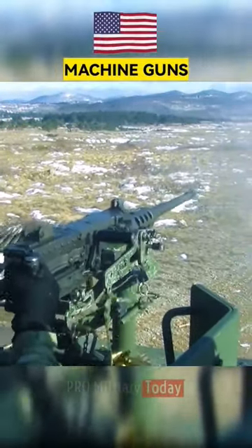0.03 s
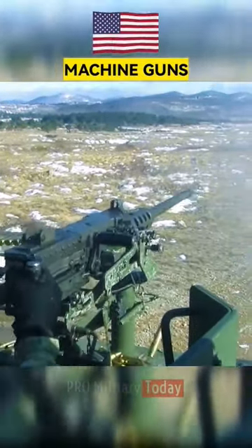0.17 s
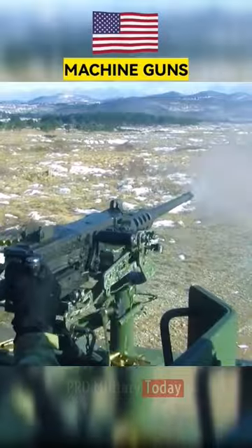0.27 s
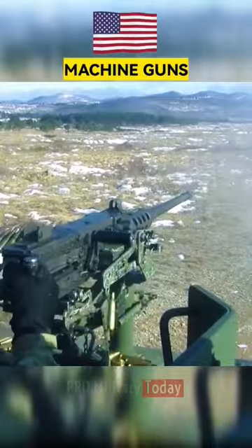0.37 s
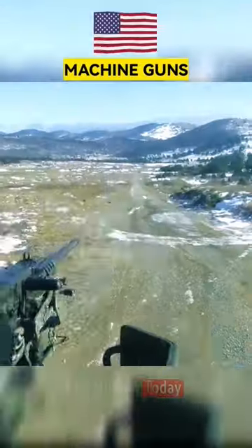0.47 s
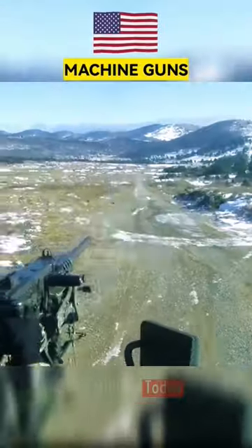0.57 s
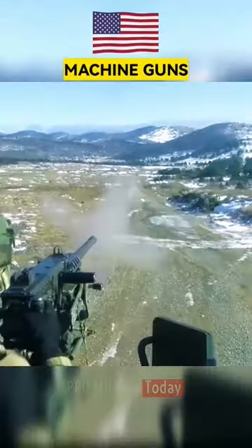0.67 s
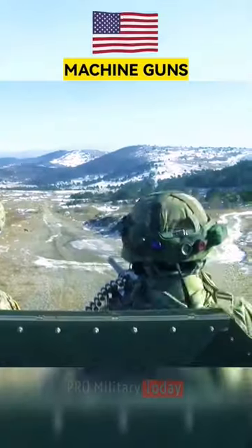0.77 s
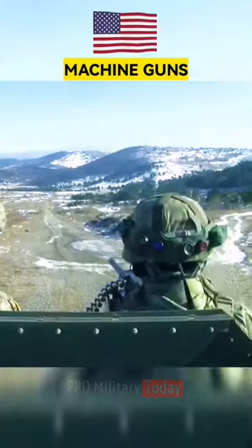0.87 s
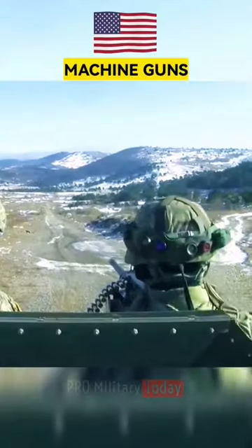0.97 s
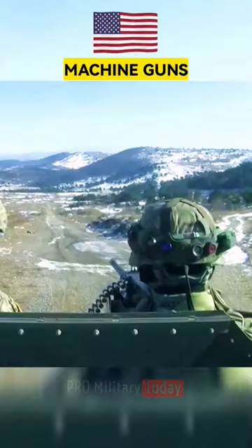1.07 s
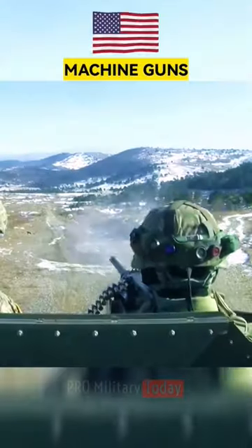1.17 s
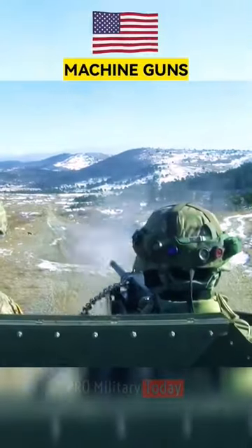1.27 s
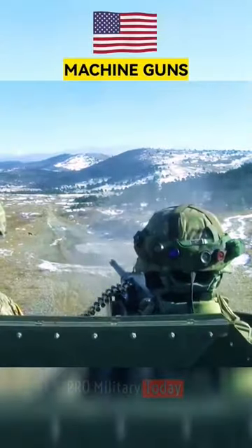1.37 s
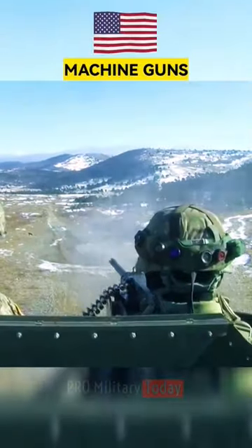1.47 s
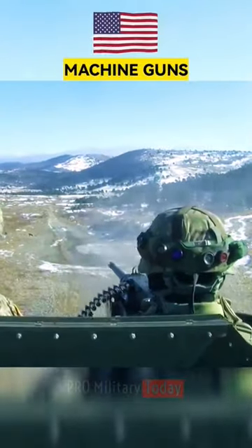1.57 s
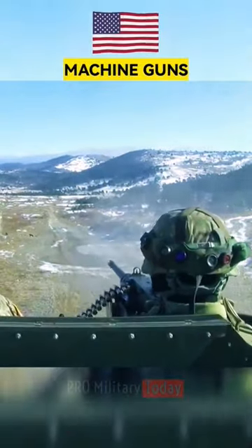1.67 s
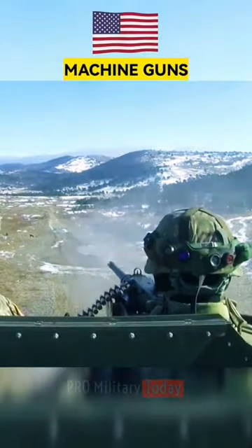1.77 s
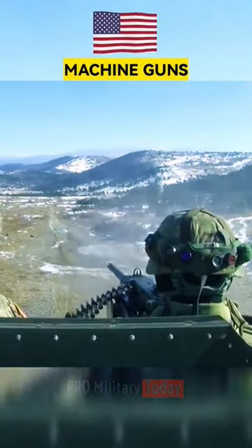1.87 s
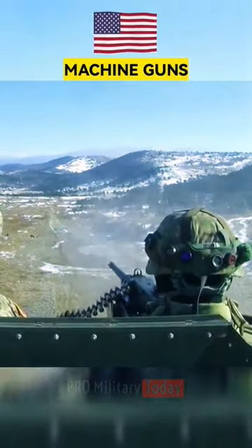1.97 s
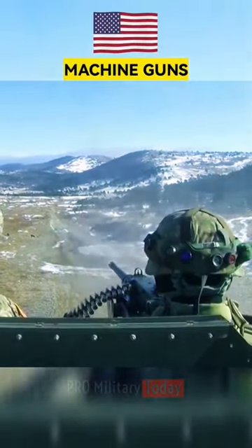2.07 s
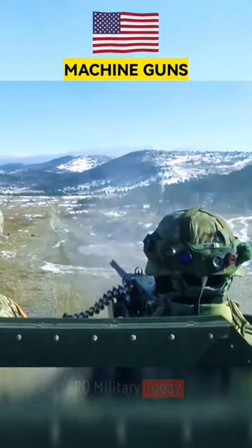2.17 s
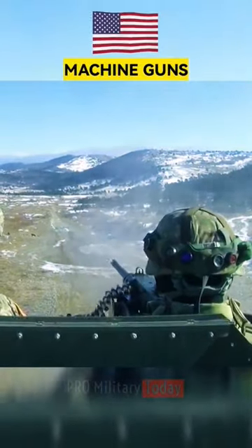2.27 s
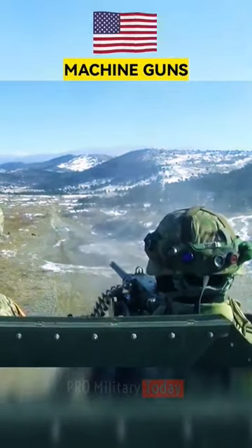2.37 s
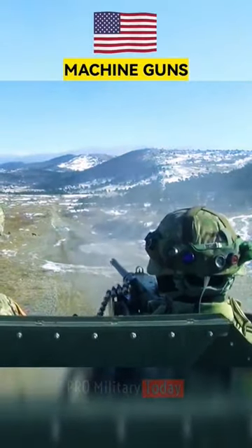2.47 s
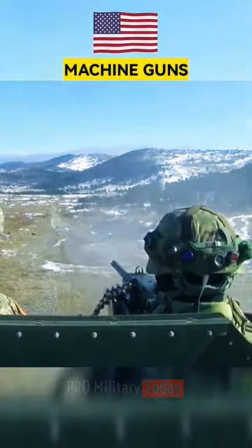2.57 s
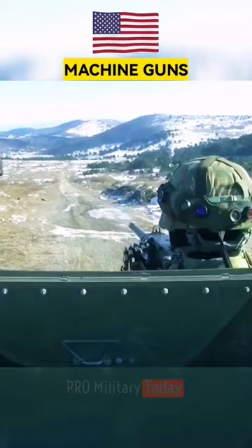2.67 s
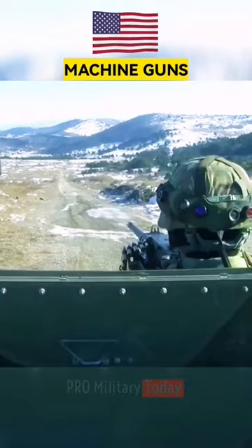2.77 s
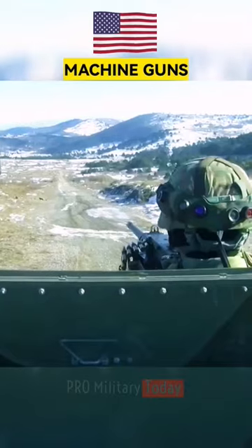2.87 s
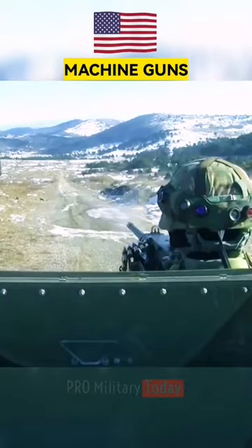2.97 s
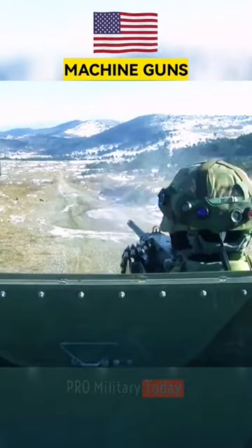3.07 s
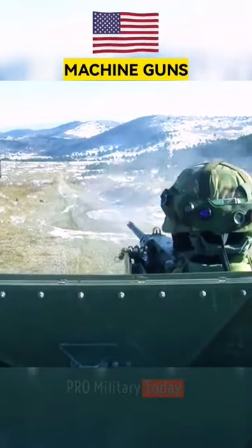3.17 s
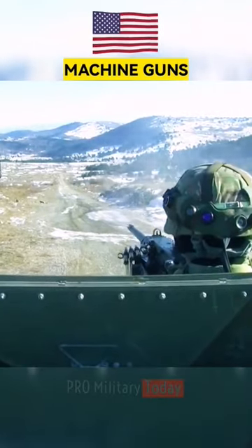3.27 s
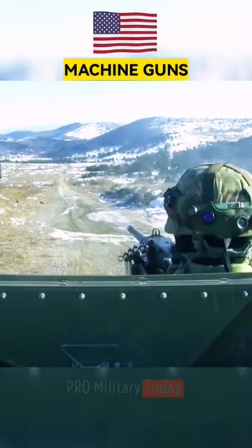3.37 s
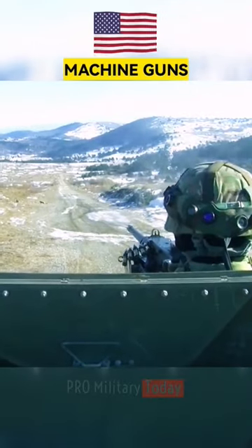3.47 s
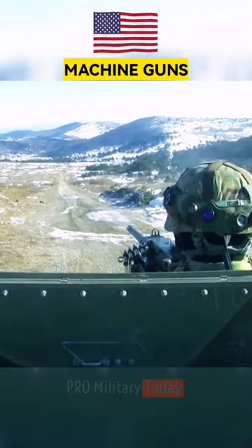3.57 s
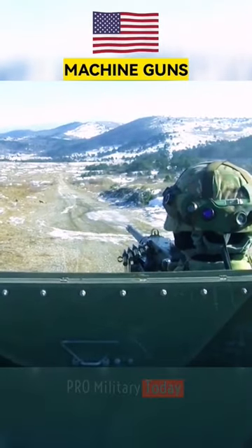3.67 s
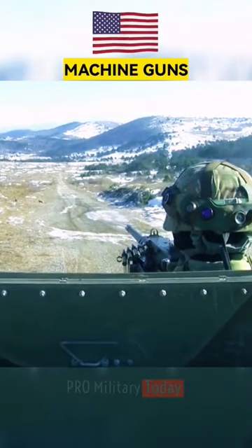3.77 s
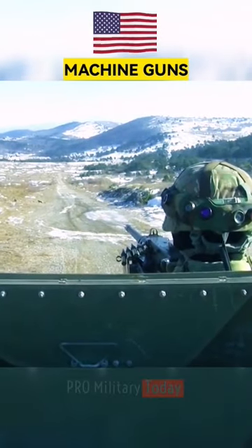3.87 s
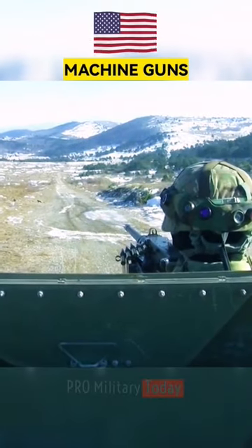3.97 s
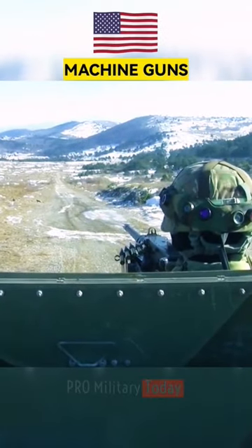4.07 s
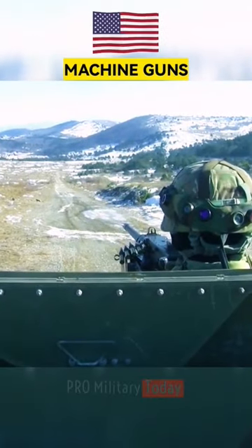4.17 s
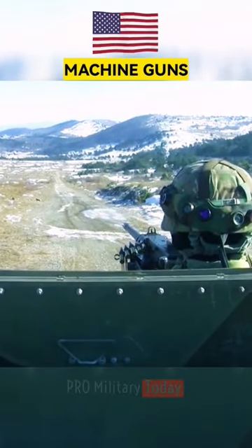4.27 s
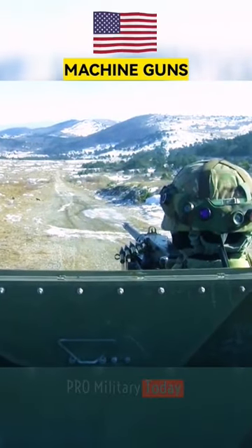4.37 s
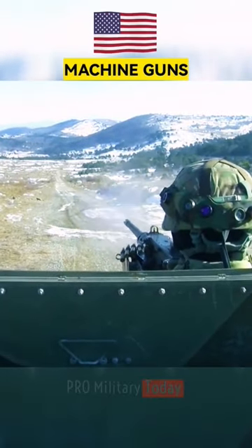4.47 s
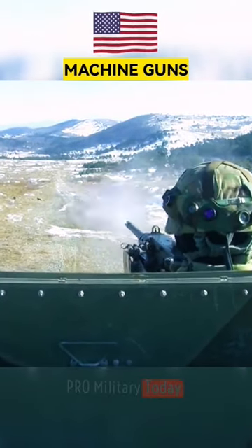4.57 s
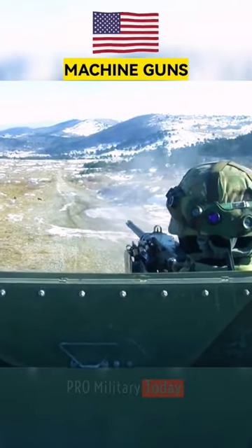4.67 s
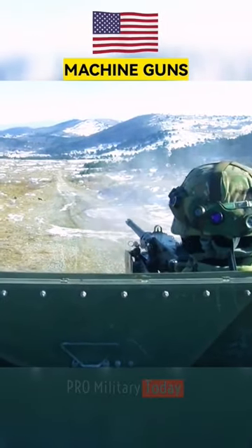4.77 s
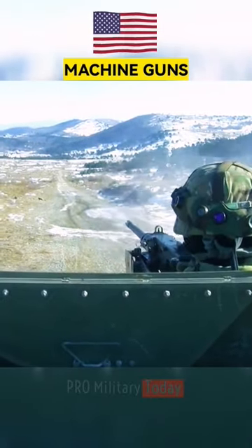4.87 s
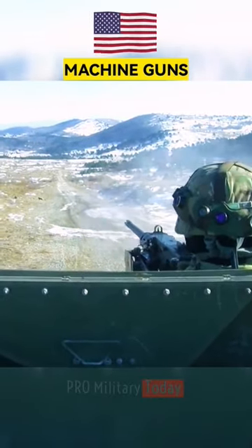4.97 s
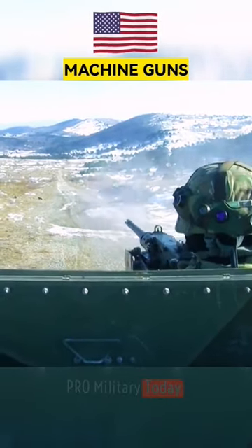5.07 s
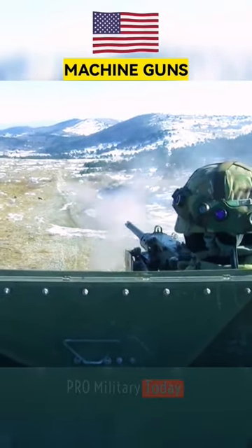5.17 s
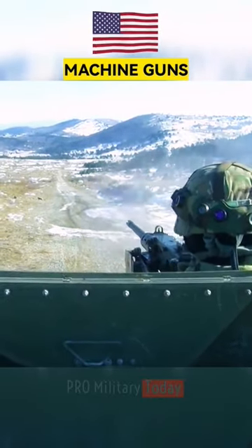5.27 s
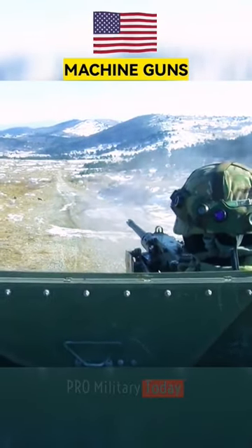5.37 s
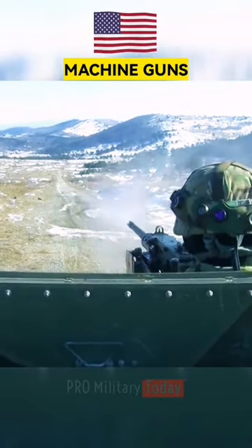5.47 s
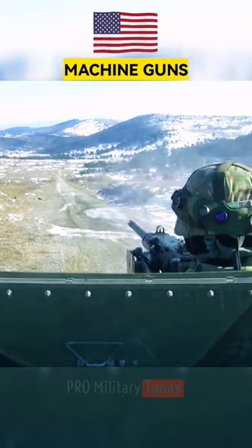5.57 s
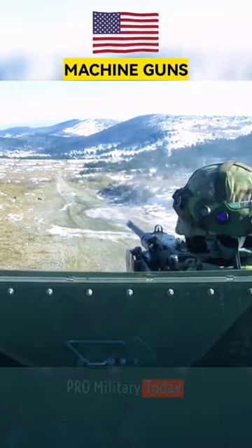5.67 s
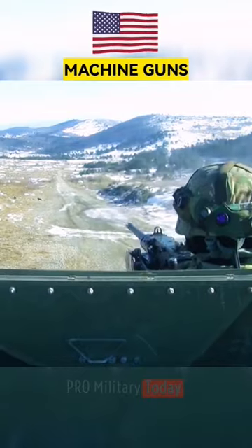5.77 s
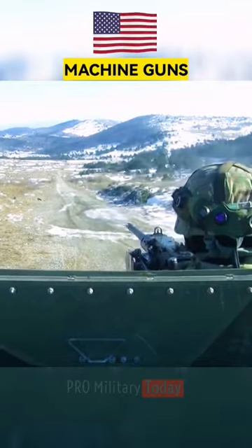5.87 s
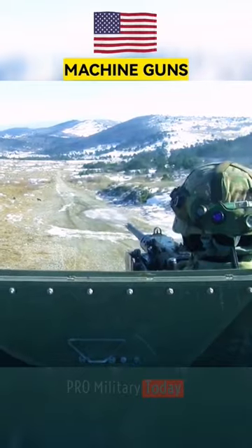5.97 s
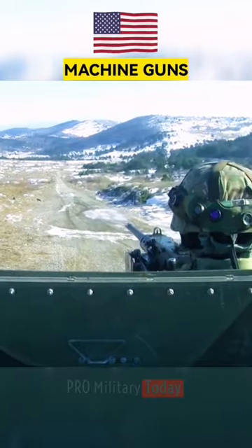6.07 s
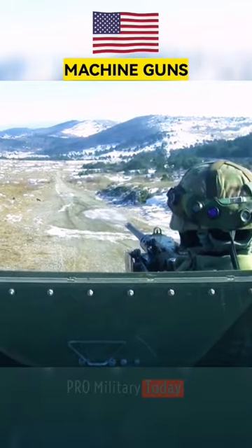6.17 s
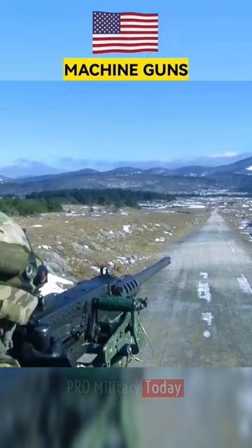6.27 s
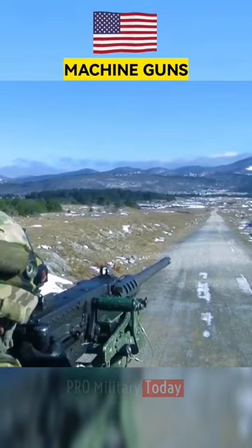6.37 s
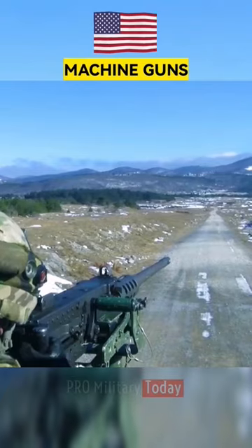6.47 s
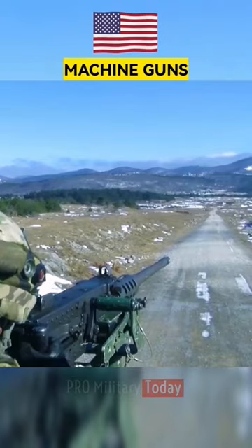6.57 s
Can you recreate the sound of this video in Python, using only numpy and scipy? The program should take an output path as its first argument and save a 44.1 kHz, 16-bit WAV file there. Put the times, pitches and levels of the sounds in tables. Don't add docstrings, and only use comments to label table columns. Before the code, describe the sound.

A heavy machine gun hammers out overloaded bursts on a windy open range, with pauses of rattling links, ringing brass and wind buffeting.

```python
import sys
import numpy as np
from scipy import signal
from scipy.fft import rfft, irfft
from scipy.io import wavfile
from scipy.ndimage import uniform_filter1d

SR = 44100
rng = np.random.default_rng(int(sys.argv[2]) if len(sys.argv) > 2 else 0)


def voltage_ratio(decibels):
    exponent = np.asarray(decibels, float) / 20
    return 10 ** exponent


def generate_wav(signal):
    frames = np.transpose(np.atleast_2d(signal))
    scaled = np.clip(frames, -1, 1) * 32767
    pcm = np.round(scaled).astype(np.int16)
    wavfile.write(sys.argv[1], SR, pcm)


N = 292383
STEPS = np.arange(0, N / SR + .002, .001)

# time in seconds, microphone ceiling in dB,
# bolt slam just before it in dB, crack drive into the microphone in dB.
BESIDE_SHOTS = [
    (.124, -6, -18, 8),
    (.291, -7.5, -20.5, 13),
    (.461, -6, -20, 8.5),
]
# (s, dB, dB, dB).
BEHIND_SHOTS = [(1.46, -7, -31, 9.7), (1.622, -6.5, -32, 6.5), (1.781, -6.5, -34.5, 7.4),
                (1.946, -7, -27, 7.9), (2.134, -6.5, -34, 7.7), (2.276, -7, -39, 8.2),
                (2.426, -6.5, -31, 7.8), (2.593, -7, -35, 8.2), (2.749, -7, -29, 9.6),
                (3.321, -6.5, -24, 10), (4.765, -6, -21, 7.2), (4.915, -7, -31, 10.2),
                (5.089, -6, -29.5, 7.6), (5.224, -7, -32, 8.2), (5.371, -7, -33, 11), (5.515, -7, -37, 10),
                (5.659, -6.5, -28, 8.4)]
# time in
# seconds, peak in dB, treble over the peak in dB, pitch of the struck plate in Hz.
CLANKS = [(.582, -25.5, -3.5, 3100), (.613, -16.5, -6, 1890), (.615, -21, -0.5, 1010),
          (.849, -46, 10, 2030), (.865, -28, -12, 940), (.88, -36, -6, 1500), (.909, -32.5, -9, 2190),
          (2.974, -40, -5, 1000), (3.466, -34, 2, 1050), (3.526, -29.5, -12.5, 2170),
          (3.601, -34, -6, 2080), (3.739, -44, 1, 1710), (3.767, -37, -25, 3130), (3.836, -29, -37, 1350),
          (3.986, -31.5, -19, 1150), (4.063, -33.5, -34, 1580), (4.08, -22.5, -2.5, 1680),
          (4.133, -23, -13, 920), (4.179, -10.5, -14, 2900), (4.277, -25.5, -26, 1060),
          (4.421, -12, -16, 1460), (4.473, -31, 0, 902), (5.781, -25.5, -5.5, 3100), (5.938, -27, -9, 2110),
          (6.086, -42, 0, 4100), (6.13, -38, -20, 1440), (6.211, -26, -22, 1710), (6.272, -25, -12, 2140),
          (6.389, -31, -17.5, 945), (6.43, -25, -19, 1540)]
# start in seconds, end in seconds.
QUIET = [
    (.62, 1.305),
    (2.824, 3.165),
    (3.49, 4.611),
    (5.79, 6.461),
    (6.463, 6.64),
]
# start in seconds, end in seconds,
# brass ring in dB, link fizz in dB.
HEAPS = [
    (-.1, .6, -56, -59.5),
    (1.32, 2.8, -61, -68),
    (3.216, 3.5, -60, -67),
    (3.48, 3.84, -66, -95),
    (4.568, 5.88, -61.5, -63),
    (5.84, 6.28, -61, -90),
]


def gunfire():
    # pitch in Hz, level in dB, time to fall 60 dB in s.
    mount_modes = [(280, 9, .02), (345, 2.5, 0.034), (540, -2.5, 0.014), (606, -1, 0.046),
                   (656, -5.5, 0.082), (1000, 2, 0.013)]
    # pitch in Hz, level in dB, time to fall 60 dB in s.
    hull_modes = [(272, 11.5, .018), (425, -7, .107), (545, 10.6, .025), (560, -7, .09), (627, 10.2, .015),
                  (741, 5.4, .027), (812, -5, .063), (903, 7, .017)]
    # time in seconds, ceiling in dB, bolt slam in dB, #
    # crack drive in dB, slow sag after the shot from 0 to 1.
    opening_shots = [
        (1.307, -3.4, -33, 8.3, .4),
        (3.168, -3.5, -31.5, 11, .6),
        (4.613, -5, -17, 12, .24),
    ]
    lead_s, boom_after_s, opening_boom_after_s = .012, .011, .0154
    beside_sag, behind_sag = .025, .06
    out = np.zeros(N)
    earlier = shot(*BESIDE_SHOTS[0], beside_sag, boom_after_s, mount_modes, lead_s)
    add(out, 0, earlier[round(.13 * SR):])
    for row in BESIDE_SHOTS:
        add(out, row[0] - lead_s, shot(*row, beside_sag, boom_after_s, mount_modes, lead_s))
    for row in BEHIND_SHOTS:
        add(out, row[0] - lead_s, shot(*row, behind_sag, boom_after_s, hull_modes, lead_s))
    for row in opening_shots:
        add(out, row[0] - lead_s, shot(*row, opening_boom_after_s, hull_modes, lead_s))
    return out


def shot(s, ceiling_db, slam_db, drive_db, sag, boom_after_s, modes, lead_s):
    # frequency in Hz, level in dB per Hz.
    crack_colour = [(140, -9), (300, -1), (900, -4), (1650, 1), (3100, -3), (5000, -5.5), (9000, -11.5),
                    (15000, -41.5)]
    # delay in seconds, level in dB.
    boom_echoes = [
        (.0252, -18),
        (.0277, -14),
        (.051, -25),
        (.068, -25),
        (.072, -25),
    ]
    # frequency in Hz, level in dB per Hz.
    tail_colour = [(35, -78), (60, -48.5), (176, -17), (268, -6), (437, -5), (503, -7.5), (903, -3),
                   (991, -8.5), (1660, -9), (3420, -12), (11800, -32.5), (14900, -41), (16000, -64.5)]
    # frequency in Hz, time to fall 60 dB in seconds.
    tail_t60 = [(100, 0.53), (500, 0.17), (2000, 0.27), (5000, 0.26), (12000, 0.26)]
    # frequency in Hz, level in dB per Hz.
    hillside_colour = [(90, -32), (160, -2.5), (600, -8.5), (900, -11.5), (2500, -9.5), (4000, -17.5),
                       (8500, -27), (11000, -48.5)]
    # frequency in Hz, level in dB per Hz.
    slam_colour = [(300, -13.5), (1000, 5.5), (2500, -7), (6000, -5.5), (15000, -18)]

    t = np.arange(round(.9 * SR)) / SR - lead_s
    size = len(t)
    late = t - boom_after_s
    u = np.maximum(t, 0)

    crack = coloured(crack_colour, size) * voltage_ratio(drive_db - 16.7 * (t / boom_after_s) ** 2) * (t > 0)
    crack *= np.clip((.001 - late) / .0006, 0, 1)
    hull = boom(late, modes) + sum(voltage_ratio(g) * boom(late - delay, modes) for delay, g in boom_echoes)

    tail = voltage_ratio(-5.5) * dying(tail_colour, tail_t60, .9) * np.clip(late / .0037, .15, 1) * (late > 0)
    tail *= 1 + .8 * np.exp(-((late - .0275) / .0025) ** 2)
    rattle = evened(uniform_filter1d(rng.standard_normal(size), size=220))
    tail *= voltage_ratio(1.3 * rattle)

    falling = .76 + .24 * np.exp(-u / .012)
    ragged_edge = voltage_ratio(.29 * coloured(crack_colour, size) * (late < 0))
    ceiling = voltage_ratio(ceiling_db - 4) * falling * ragged_edge

    offset = sag * (u / .024) ** 2 * np.exp(2 - 2 * u / .031)
    offset += .047 * sag * np.exp(-u / .25) * (t > 0)
    offset -= .11 * np.sin(2 * np.pi * 75 * u) * np.exp(-u / .012)

    slam = voltage_ratio(slam_db) * coloured(slam_colour, size) * (t <= 0)
    slam *= voltage_ratio(1200 * t) * np.clip((t + lead_s - .004) / .004, 0, 1)
    hillside = voltage_ratio(-37 - 60 * t / 1.36) * coloured(hillside_colour, size)
    hillside *= np.clip(late / .023, 0, 1) * np.clip((.85 - t) / .3, 0, 1)
    return ceiling * (np.tanh(crack + hull + tail) - offset) + slam + hillside


def boom(t, modes):
    u = np.maximum(t, 0)
    ring = sum(voltage_ratio(db - 60 * u / t60) * np.sin(2 * np.pi * hz * u) for hz, db, t60 in modes)
    return -np.clip(u / .001, 0, 1) ** 3 * ring


def dying(points, t60, seconds):
    size = round(seconds * SR)
    hz, t, bands = signal.stft(coloured(points, size), SR, nperseg=128)
    decay = voltage_ratio(-60 * t / read(t60, hz)[:, None])
    return signal.istft(bands * decay, SR, nperseg=128)[1][:size]


def rolling_cases():
    # pitch in Hz, level in dB, time to fall 60 dB in seconds.
    case_modes = [(3774, -11, .25), (4880, -1, .4), (4990, -7, .2), (5700, -7, .4), (6245, -5, .22),
                  (6352, 1, .33), (6417, -2, .33), (7105, -5, .4), (7639, -7, .35), (7978, -9, .35),
                  (8640, -14, .2), (8985, -6, .2), (9055, -4, .4), (10519, -15, .3), (10770, -12, .3),
                  (11738, -11, .28), (12155, -12, .28), (13050, -23, .25), (13889, -19, .25),
                  (14940, -16, .3)]
    # time in seconds, ring in dB.
    rolls = [(3.75, -59), (3.8, -59), (3.91, -60), (4.08, -60), (4.19, -41), (4.3, -47), (4.43, -49),
             (4.48, -56), (5.94, -61), (6.14, -62), (6.22, -57), (6.28, -47), (6.35, -52), (6.4, -52)]
    gain = sum(swell(s, db, .02, .3, QUIET) for s, db in rolls)
    return brass(gain, case_modes, db_over=3.5)


def piling_cases():
    # pitch in Hz, level in dB, time to fall 60 dB in seconds.
    pile_modes = [(4950, -12, .15), (6352, 0, .2), (6430, -3, .15), (9020, -6, .15), (11900, -13, .12),
                  (12200, -14, .12)]
    return brass(heaped(column=2, ramp_db=24), pile_modes, db_over=5)


def brass(gain, modes, db_over):
    t, out = np.arange(round(.4 * SR)) / SR, np.zeros(N)
    hz, db, t60 = np.transpose(modes)[:, :, None]
    detuned_hz = hz * rng.uniform(1.003, 1.008, hz.shape)
    pair = np.sin(2 * np.pi * hz * t) + .45 * np.sin(2 * np.pi * detuned_hz * t)
    rings = voltage_ratio(db - 60 * t / (1.3 * t60)) * pair * np.clip(t / .003, 0, 1)

    bounces = rng.uniform(0, N / SR, round(32 * N / SR))
    times = [*bounces, *np.array(CLANKS)[:, 0]]
    sizes = [1] * len(bounces) + [1.8] * len(CLANKS)
    shares = np.clip(rng.standard_normal((len(times), len(modes))), -1.6, 1.6)
    for s, size, share in zip(times, sizes, shares):
        add(out, s, size * share * abs(share) ** .3 @ rings)
    steady = out / np.sqrt(uniform_filter1d(out ** 2, size=6000) + .1 * np.mean(out ** 2))
    return voltage_ratio(db_over) * audio(gain) * steady


def clanks():
    out = np.zeros(N)
    for row in CLANKS:
        add(out, row[0], clank(*row[1:]))
    return out


def clank(db, treble_db, hz):
    t = np.arange(round(.12 * SR)) / SR
    thud = coloured([(200, -23.5), (600, -2.5), (2500, -4.5), (4500, -12), (9000, -45), (16000, -70)], len(t))
    plate = coloured([(.35 * hz, -30), (hz, 0), (1.4 * hz, -28), (4 * hz, -65)], len(t)) * np.exp(-t / .011)
    tick = coloured([(2000, -12), (4500, 5.5), (9000, -5), (11000, -20), (16000, -44)], len(t))
    t60 = max(.085 + .0018 * (db + 26.5), .03)
    attack = np.clip(t / .001, 0, 1)
    return voltage_ratio(db - 9.5 - 60 * t / t60) * (thud + .82 * plate + voltage_ratio(treble_db) * tick) * attack


def clatter():
    # frequency in Hz, level in dB per Hz.
    rattle_colour = [(60, -39), (130, -15), (280, -6.5), (520, -2.5), (1000, -7), (1700, -3.5), (3200, -14),
                     (4400, -26), (7000, -33), (15000, -58)]
    # frequency in Hz, level in dB per Hz.
    fizz_colour = [(2000, -22.5), (3300, 10), (5500, -10.5), (9000, -6), (12000, -21.5), (15000, -28.5)]
    knocks = voltage_ratio(3 * np.minimum(rng.exponential(1, N), 4)) * (rng.random(N) < 120 / SR)
    grain = 1 + evened(signal.lfilter([1], [1, -np.exp(-1 / (.0081 * SR))], knocks))
    rattle = voltage_ratio(2) * audio(bed(column=1, share=1)) * evened(coloured(rattle_colour, N) * grain)
    at_shots = sum(swell(row[0], -61, .05, .05, HEAPS) for row in BESIDE_SHOTS + BEHIND_SHOTS)
    fizz_gain = audio(heaped(column=3, ramp_db=7) + at_shots)
    return rattle + voltage_ratio(10.5) * fizz_gain * evened(coloured(fizz_colour, N) * grain)


def wind():
    # frequency in Hz, level in dB per Hz.
    wind_colour = [(15, -28.5), (25, -10.5), (64, -1), (168, -8.5), (271, -15.5), (352, -22.5), (536, -26),
                   (977, -39.5), (1750, -56.5), (3000, -84), (3900, -100), (6600, -120)]
    # frequency in Hz, level in dB per Hz.
    flutter_colour = [(200, -23.5), (350, -3.5), (600, -1), (1100, -8), (2300, -38), (5000, -80)]
    # frequency in Hz, level in dB per Hz.
    hiss_colour = [(1500, -28.5), (3500, 4), (9000, -10), (15000, -13)]
    # peak in seconds, wind in dB, flutter in dB, seconds to fall 20 dB either side.
    gusts = [(.63, -28.5, -46, 0.12), (.72, -25.5, -43.5, 0.11), (.83, -46, -43, .05), (.78, -39, -46, .08),
             (.936, -34, -60, 0), (1.002, -30.5, -66.5, .1), (1.285, -31.5, -63, 0.12), (2.84, -38, -75, 0),
             (2.995, -35, -61, -0.03), (3.14, -34, -64, 0), (3.98, -48, -50, .2), (4.08, -48, -40, .08),
             (4.186, -50, -31, 0.05), (4.288, -28, -23, .05), (4.428, -45, -30.5, 0.03),
             (4.53, -38, -50, .1), (4.595, -29, -40, .05), (5.934, -70, -43, 0.07), (6.13, -62, -42, 0.07),
             (6.22, -58, -50, .15), (6.37, -45, -31, 0.07), (6.63, -26, -56, .07)]
    # peak in seconds, level in dB, rise in seconds, fall in seconds.
    breeze = (1.18, -73, .3, .15)
    lumpy = voltage_ratio(1.33 * lumps(size=500))
    low = bed(column=0, share=1.4) + sum(swell(s, db, w, w, QUIET) for s, db, _, w in gusts)
    high = bed(column=2, share=1.2) + sum(swell(s, db, w, w, QUIET) for s, _, db, w in gusts)
    air = bed(column=3, share=.7) + swell(*breeze, QUIET)
    buffeting = voltage_ratio(-1) * audio(low) * evened(coloured(wind_colour, N) * lumpy)
    flutter = audio(high) * evened(coloured(flutter_colour, N) * lumpy)
    hiss = voltage_ratio(11) * audio(air) * coloured(hiss_colour, N)
    return buffeting + flutter + hiss


def bed(column, share):
    # wind in dB, clatter in dB, flutter in dB,
    # air hiss in dB.
    beds = [
        (-47, -60, -61, -83),
        (-39, -69, -61, -81.5),
        (-40, -31.5, -41, -71),
        (-56, -31, -41, -76),
        (-41, -61.5, -48, -83),
    ]
    # time in seconds, gain in dB.
    recovery = [
        [(3.5, -19), (3.65, -20), (3.98, -11), (4.09, -2), (4.16, -3.5), (4.2, 2), (4.3, 1), (4.36, -3),
         (4.59, -6)],
        [(5.8, -21), (6.0, -23.5), (6.1, -15), (6.22, -11), (6.31, -7), (6.37, -2), (6.45, -2)],
    ]
    lift_db = 0
    for rows, (a, b) in zip(recovery, QUIET[2:]):
        lift_db = lift_db + np.interp(STEPS, *np.transpose(rows)) * within(a, b)
    return sum(voltage_ratio(row[column] + share * lift_db) * within(a, b) for row, (a, b) in zip(beds, QUIET))


def heaped(column, ramp_db):
    gain = 0
    for row in HEAPS:
        a, b = row[:2]
        edge = np.clip(1 - np.minimum(STEPS - a, b - STEPS) / .089, 0, 1)
        gain = gain + voltage_ratio(row[column] - ramp_db * edge) * within(a, b)
    return gain


def swell(s, db, rise_s, fall_s, spans):
    a, b = next(span[:2] for span in spans if span[0] <= s <= span[1] + .01)
    slope = np.where(STEPS < s, (s - STEPS) / max(rise_s, .002), (STEPS - s) / max(fall_s, .002))
    return voltage_ratio(db - 20 * slope) * within(a, b)


def within(a, b):
    return (STEPS >= a) & (STEPS < b)


def audio(gain):
    return np.interp(np.arange(N) / SR, STEPS, gain)


def lumps(size):
    return evened(uniform_filter1d(uniform_filter1d(rng.standard_normal(N), size), size))


def coloured(points, size):
    spectrum = rfft(rng.standard_normal(size))
    return evened(irfft(spectrum * voltage_ratio(read(points, np.fft.rfftfreq(size, 1 / SR))), size))


def evened(x):
    return x / np.sqrt(np.mean(x ** 2) + 1e-20)


def read(points, hz):
    f, value = np.transpose(points)
    return np.interp(np.log(hz + 1), np.log(f + 1), value)


def add(mix, s, sound):
    changes = [
        .621,
        2.824,
        6.462,
    ]
    end = min([c for c in changes if c > s] + [N / SR])
    part = mix[round(s * SR):round(end * SR)][:len(sound)]
    part += sound[:len(part)]


def scene():
    mix = gunfire() + rolling_cases() + piling_cases() + clanks() + clatter() + wind()
    return mix[None]


def top_cut(x):
    return signal.sosfilt(signal.butter(12, 16490, fs=SR, output="sos"), x)


def record(dry):
    x = signal.sosfilt(signal.butter(1, 12, "highpass", fs=SR, output="sos"), dry)
    low = signal.oaconvolve(x, signal.firwin(255, 15250, fs=SR)[None], "same")
    x = low + voltage_ratio(-17.5) * (x - low)
    top_edge = signal.firwin(255, 16400, window=("kaiser", 9), fs=SR)
    return top_cut(signal.oaconvolve(x, top_edge[None], "same"))


dry = scene()
out = record(dry)
generate_wav(out)
```